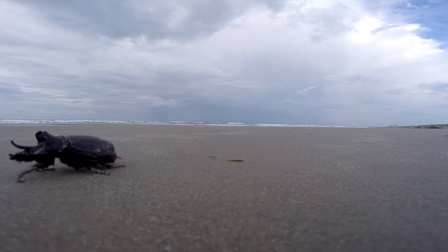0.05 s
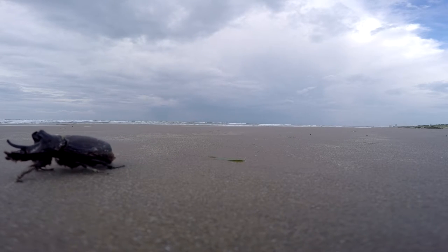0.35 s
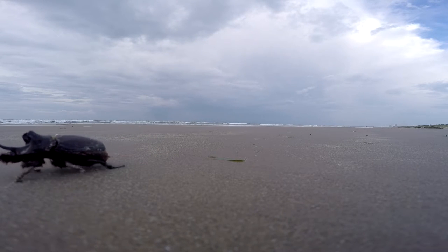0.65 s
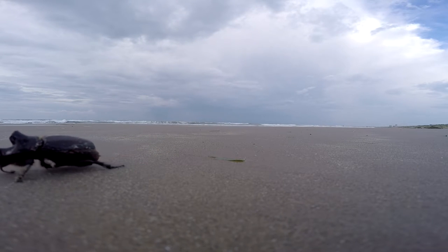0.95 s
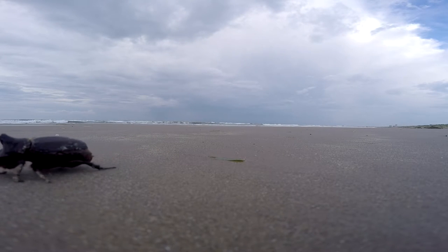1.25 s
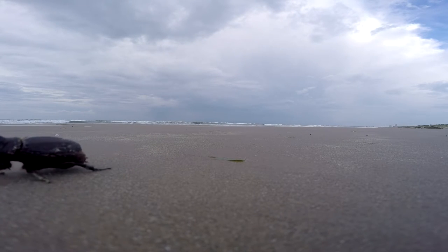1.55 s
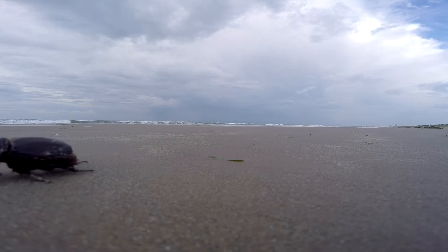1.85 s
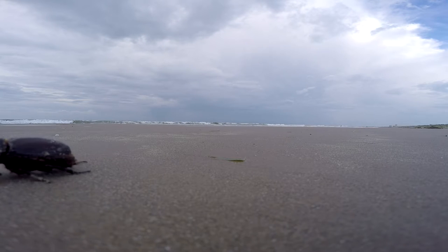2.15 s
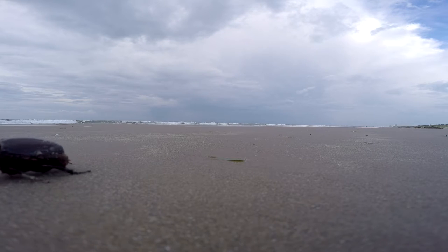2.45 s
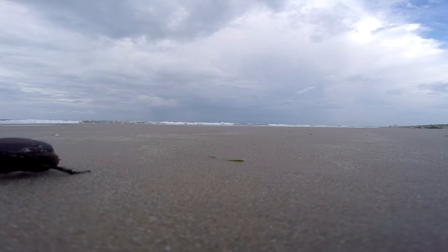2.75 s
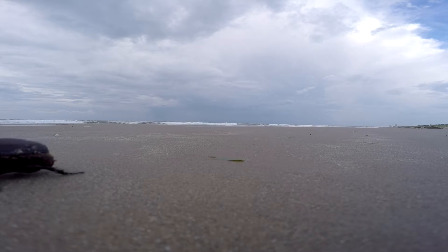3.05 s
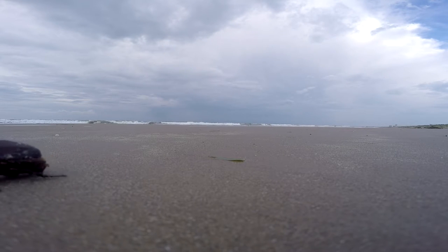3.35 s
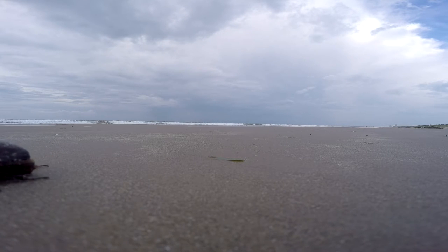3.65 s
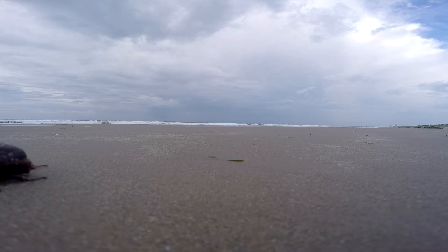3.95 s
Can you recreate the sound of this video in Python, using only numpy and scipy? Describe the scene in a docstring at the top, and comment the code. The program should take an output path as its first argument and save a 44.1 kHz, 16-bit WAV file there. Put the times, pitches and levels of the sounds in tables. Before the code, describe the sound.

Gusty wind rumbles and thumps on the microphone over a faraway wash of waves.

```python
"""Wind buffets a microphone lying low on an open beach, with two stronger gusts.
The faster the air, the louder and brighter the buffeting. Large slow eddies add a deep rumble,
small ones patter, and single strong ones thump on the microphone port; a limiter ducks the peaks.
Behind it, distant surf roars steadily under a fine high hiss."""
import sys
import numpy as np
from scipy import signal
from scipy.fft import rfft, irfft
from scipy.io import wavfile
from scipy.ndimage import uniform_filter1d, minimum_filter1d

SR = 44100
rng = np.random.default_rng(int(sys.argv[2]) if len(sys.argv) > 2 else 0)


def wav_out(sig):
    """Save sig, one row per channel (or a flat mono array), as 16-bit PCM at SR to the path in sys.argv[1]."""
    wavfile.write(sys.argv[1], SR, np.round(np.clip(np.atleast_2d(sig).T, -1, 1) * 32767).astype(np.int16))


N = 176400

# Strength of the wind at the microphone (time [s], level [dB])
WIND_LEVEL = [(0, -20.5), (.05, -30), (.12, -20), (.23, -23), (.3, -22), (.35, -24.5), (.44, -19.5),
              (.5, -24), (.7, -18.5), (.8, -25.5), (.88, -21), (.94, -30), (1.04, -18), (1.14, -24),
              (1.22, -12.5), (1.27, -21.5), (1.3, -10.5), (1.39, -19.5), (1.46, -16.5), (1.63, -21.5),
              (1.72, -20.5), (1.87, -29.5), (1.93, -20), (2.07, -28), (2.13, -19), (2.28, -32), (2.41, -30),
              (2.5, -21), (2.6, -24.5), (2.78, -28), (2.82, -20.5), (3.0, -19.5), (3.06, -16), (3.13, -21),
              (3.21, -16), (3.26, -14.5), (3.42, -12.5), (3.49, -20), (3.54, -17), (3.6, -21.5),
              (3.76, -19), (3.84, -20), (3.97, -17.5), (4, -15)]


def buffeting(t):
    """Turbulence at the port flutters, and grows louder and brighter with the wind."""
    # Tone of the turbulence in a light wind (frequency [Hz], level [dB])
    spectrum = [(30, -52), (70, 0), (120, -0.5), (220, 0), (330, -5), (500, -10.5), (750, -21.5),
                (1100, -28), (2000, -58), (5000, -80)]
    light_wind_db, octaves_per_db = -20, 0.04
    level_db = curve(WIND_LEVEL, t)
    flutter_db = 1.8 * wander(rate_hz=70)
    octaves = np.clip(octaves_per_db * (level_db + flutter_db - light_wind_db), -1, 1)
    blend = np.zeros(N)
    for shift in (-0.81, -0.5, 0.02, 0.51, 0.8):  # crossfade from dark to bright noise
        weight = np.sqrt(np.maximum(1 - 2 * abs(octaves - shift), 0))
        blend += weight * noise(spectrum, shift)
    return amp(level_db) * steadied(blend * amp(flutter_db), window_s=0.064)


def rumble(t):
    """Large slow eddies shake the air around the microphone."""
    # Swells of the low end (time [s], level [dB])
    swells = [(0, -20), (.08, -22.5), (.35, -18.5), (.56, -18.5), (.66, -24.5), (.73, -17.5), (.8, -19.5),
              (.97, -19), (1.07, -14.5), (1.12, -26), (1.19, -17.5), (1.33, -16.5), (1.58, -22),
              (1.76, -16), (1.9, -23), (1.97, -21.5), (2.13, -14), (2.26, -28.5), (2.4, -17.5), (2.6, -31),
              (2.66, -22), (2.76, -23), (2.83, -24.5), (3.02, -16), (3.19, -26), (3.26, -11.5), (3.46, -22),
              (3.54, -12), (3.65, -19), (3.75, -15.5), (3.82, -34), (3.89, -16), (4, -14)]
    # Deep tone of the large eddies (frequency [Hz], level [dB])
    spectrum = [(8, -55), (18, -33), (30, -11), (55, -7), (110, -8), (170, -10), (300, -23.5), (800, -75)]
    return amp(curve(swells, t)) * steadied(noise(spectrum), window_s=0.062)


def patter(t):
    """Many small eddies of mixed sizes hit at random, harder as the wind rises."""
    eddies_per_s, above_wind_db = 45, 4
    pitches_hz = np.geomspace(110, 490, 10)
    pulse_t = np.arange(-SR // 20, SR // 20) / SR
    strength = amp(curve(WIND_LEVEL, t) + above_wind_db)
    out = np.zeros(N)
    for hz in pitches_hz:
        hits = rng.random(N) < eddies_per_s / len(pitches_hz) / SR
        out += signal.oaconvolve(hits * strength, eddy(pulse_t, hz), "same")
    return out


def thumps(t):
    """Each strong eddy thumps on the port and leaves a short turbulent wake."""
    # Single strong eddies (time [s], level [dB], pitch [Hz])
    hits = [(0.1126, -5.5, 400), (.448, -3.5, 480), (0.6929, -8.5, 478), (.739, -9.5, 186.5),
            (1.023, -7, 330), (1.2621, -7.5, 430), (1.2982, -1, 525), (1.313, -14, 480), (1.341, -8, 483),
            (1.6756, -9, 600), (1.9221, -8, 370), (2.811, -7, 130), (2.839, -10, 320), (2.879, -6.5, 200),
            (2.9241, -4, 340), (2.99, -6, 333), (3.069, -5.5, 450), (3.1927, -8.5, 484),
            (3.2697, -4.5, 328), (3.3962, -7, 322), (3.9518, -9, 327)]
    # Dull tone of the wake (frequency [Hz], level [dB])
    wake_spectrum = [(60, -23), (200, 2), (400, 0.5), (650, -1.5), (1000, -5), (1500, -29), (4000, -82)]
    wake_db, rise_s, decay_s = -10, 0.006, 0.0066
    pulses, wake = np.zeros(N), np.zeros(N)
    for at, db, hz in hits:
        near = abs(t - at) < 0.1
        age = np.maximum(t[near] - at, 0)
        pulses[near] += amp(db) * eddy(t[near] - at, hz)
        wake[near] += amp(db + wake_db) * np.minimum(age / rise_s, 1) * np.exp(-age / decay_s)
    return pulses + wake * noise(wake_spectrum)


def eddy(t, hz):
    """Pressure of an eddy passing at t = 0: a push, then a pull, peaking near 1."""
    u = np.pi * hz * t
    return -u / (1 + u ** 2 / 2) ** 3 / 0.351


def surf(t):
    """Far breakers roar; their foam makes a brighter wash."""
    # Body of the breakers (frequency [Hz], level [dB])
    roar_spectrum = [(80, -17), (250, 0), (480, -0.5), (950, -4), (1500, -9.5), (2500, -20), (5000, -31.5),
                     (15000, -53)]
    # Slow rise of the roar (time [s], level [dB])
    roar_level = [(0, -31.5), (1.5, -31), (2.1, -30), (2.5, -28), (2.75, -29.5), (3.4, -28), (4, -29)]
    # Brighter tone of the foam (frequency [Hz], level [dB])
    wash_spectrum = [(300, -20), (1000, 2.5), (2000, 1.5), (3100, -1.5), (4200, -6), (6000, -12.5),
                     (8000, -18), (11000, -26), (15000, -42.5)]
    # Nearly even bed of foam (time [s], level [dB])
    wash_level = [(0, -38), (1.15, -38), (1.36, -39.5), (1.85, -38.5), (2.1, -37.5), (2.45, -39),
                  (3.4, -39), (4, -38.2)]
    patch_db, swell_db = 0.57, 0.22
    roar = amp(curve(roar_level, t)) * patchy(noise(roar_spectrum), patch_db)
    wash = amp(curve(wash_level, t)) * patchy(noise(wash_spectrum), patch_db)
    return (roar + wash) * amp(swell_db * wander(rate_hz=12))


def hiss(t):
    """A fine, slightly grainy high hiss comes in short swells."""
    # Airy top end (frequency [Hz], level [dB])
    spectrum = [(2000, -20), (6000, -1), (10000, 0), (13000, -1.5), (15000, -3.5), (17000, -20)]
    # Swells of the hiss (time [s], level [dB])
    swells = [(0, -67), (1.45, -72), (1.8, -64), (1.94, -60.5), (2.12, -64), (2.205, -56.5), (2.27, -63),
              (2.86, -64), (2.91, -58.5), (3.05, -64), (3.11, -63), (3.14, -57.5), (3.22, -61), (3.45, -62),
              (3.65, -60), (4, -62)]
    air = noise(spectrum)
    grain_db = 2.5 * wander(rate_hz=200)
    return amp(curve(swells, t)) * unit(air * amp(grain_db))


def amp(db):
    """Decibels to gain."""
    return 10 ** (np.asarray(db) / 20)


def unit(x):
    """Scales to rms 1."""
    return x / np.sqrt(np.mean(x ** 2) + 1e-20)


def curve(points, t):
    """Reads a level curve at times t."""
    return np.interp(t, *np.transpose(points))


def wander(rate_hz):
    """Random modulation of rms 1, strongest a little below the given rate."""
    ratio = np.fft.rfftfreq(N, 1 / SR) / rate_hz
    return unit(irfft(rfft(rng.standard_normal(N)) * ratio / (1 + ratio ** 4), N))


def noise(spectrum, octaves=0):
    """Steady noise of rms 1 with a spectrum, shifted by some octaves."""
    hz = np.fft.rfftfreq(N, 1 / SR) / 2. ** octaves
    points_hz, points_db = np.transpose(spectrum)
    shape_db = np.interp(np.log(hz + 1), np.log(points_hz + 1), points_db)
    return unit(irfft(rfft(rng.standard_normal(N)) * amp(shape_db), N))


def steadied(x, window_s):
    """Evens out the slow swells of a noise, keeping its fast ones."""
    size = int(window_s * SR)
    power = uniform_filter1d(uniform_filter1d(x ** 2, size), size)
    return unit(x / np.sqrt(power + 1e-6))


def patchy(x, depth_db):
    """Lets patches about 600 Hz wide and a tenth of a second long swell and sink."""
    frames = signal.stft(x, nperseg=1024, noverlap=768)[2]
    patches = uniform_filter1d(rng.standard_normal(frames.shape), size=14, axis=0)
    patches = uniform_filter1d(patches, size=18, axis=1)
    frames *= amp(depth_db * unit(patches))
    return unit(signal.istft(frames, nperseg=1024, noverlap=768)[1][:N])


def scene():
    """Wind comes in puffs on the microphone, in front of the sea."""
    t = np.arange(N) / SR
    puffs = unit(amp(2.4 * np.tanh(wander(rate_hz=11))))
    wind = puffs * (buffeting(t) + rumble(t) + patter(t)) + thumps(t)
    return (wind + surf(t) + hiss(t))[None]


def record(dry):
    """A limiter ducks the hardest buffets and recovers; a steep low-pass trims the top."""
    ceiling_db, release_db_per_s, cutoff_hz, fade_s = -0.5, 43, 15250, 0.002
    t = np.arange(N) / SR
    over_db = np.maximum(20 * np.log10(abs(dry[0]) + 1e-9) - ceiling_db, 0)
    duck_db = np.maximum.accumulate(over_db + release_db_per_s * t) - release_db_per_s * t
    gain = amp(uniform_filter1d(minimum_filter1d(-duck_db, size=90), size=90))  # 2 ms look-ahead
    fades = np.minimum(np.minimum(t, t[-1] - t) / fade_s, 1)
    lowpass = signal.firwin(511, cutoff_hz, window=("kaiser", 9), fs=SR)
    return signal.oaconvolve(dry * gain * fades, lowpass[None], "same")


dry = scene()
out = record(dry)
wav_out(out)
```